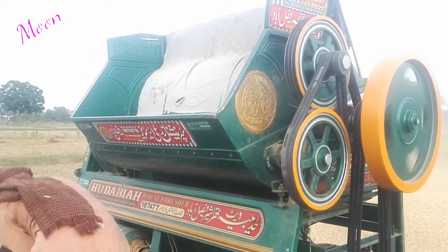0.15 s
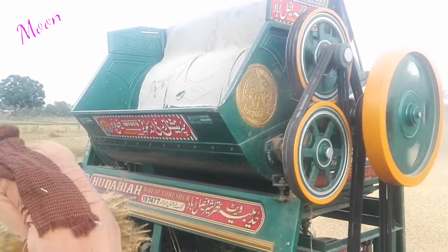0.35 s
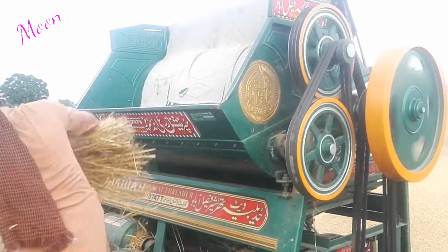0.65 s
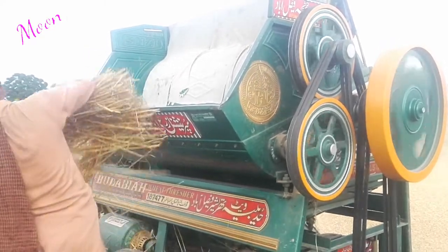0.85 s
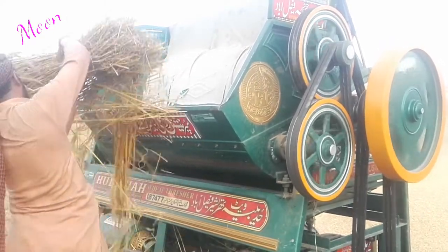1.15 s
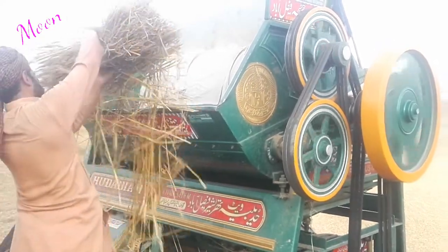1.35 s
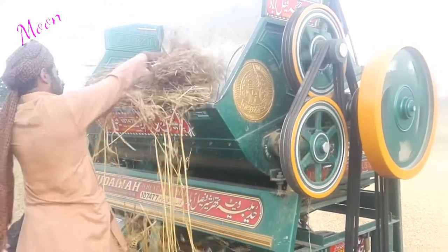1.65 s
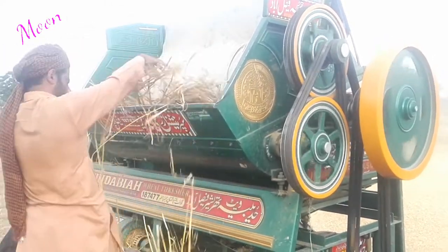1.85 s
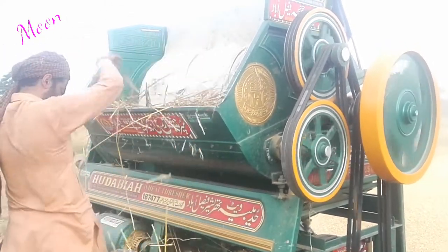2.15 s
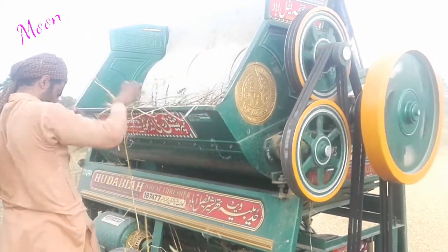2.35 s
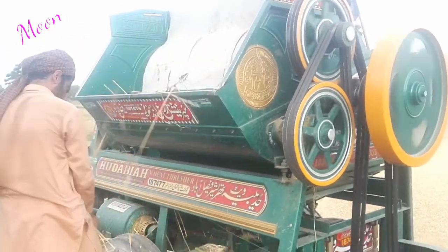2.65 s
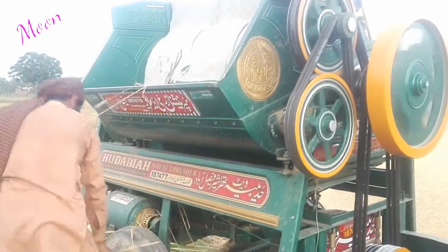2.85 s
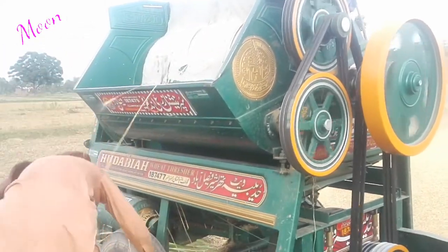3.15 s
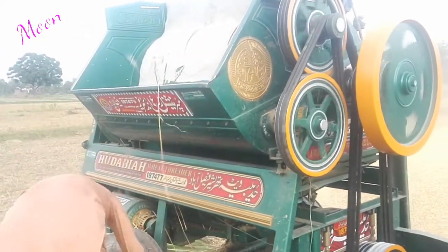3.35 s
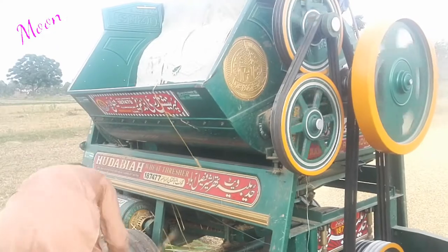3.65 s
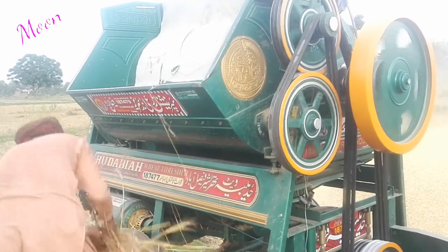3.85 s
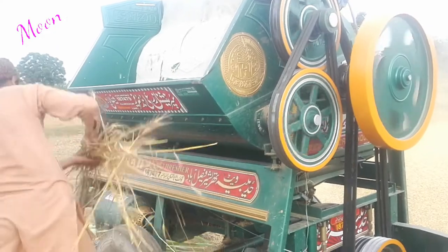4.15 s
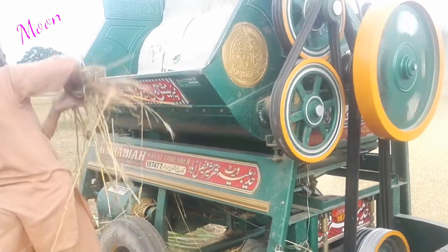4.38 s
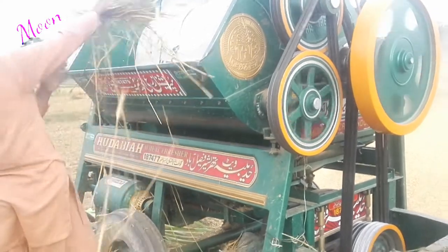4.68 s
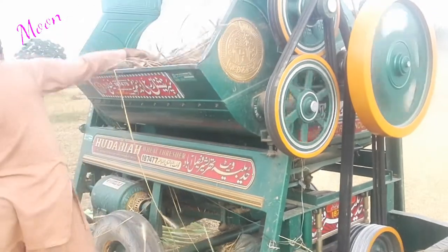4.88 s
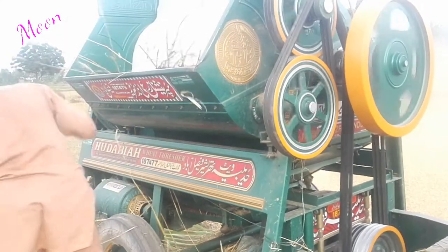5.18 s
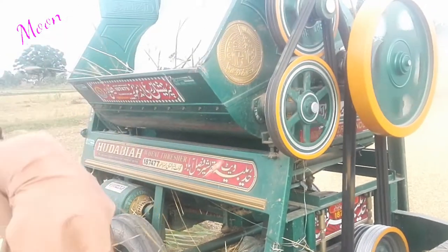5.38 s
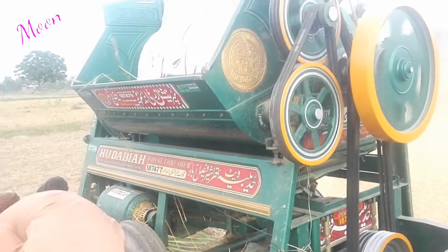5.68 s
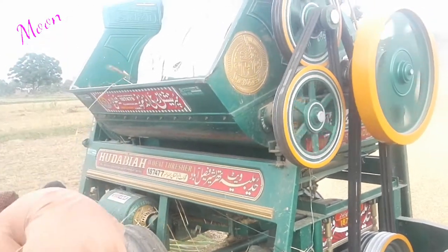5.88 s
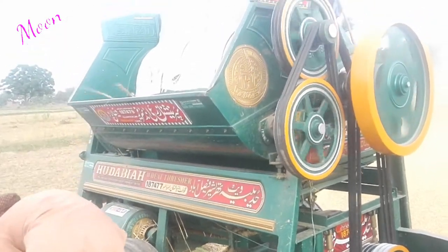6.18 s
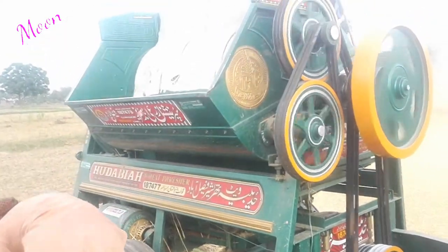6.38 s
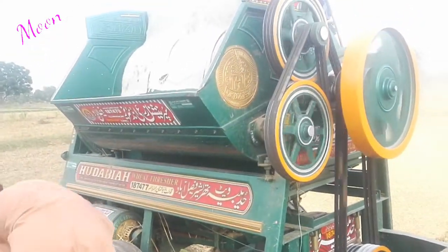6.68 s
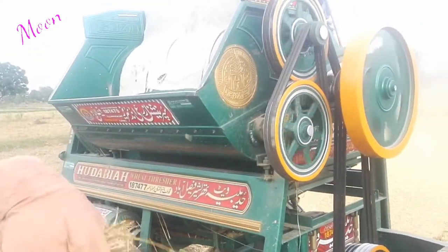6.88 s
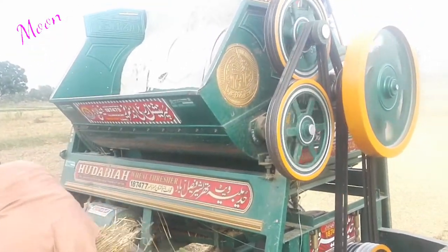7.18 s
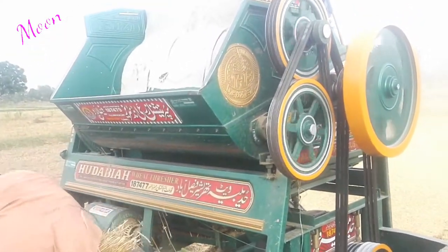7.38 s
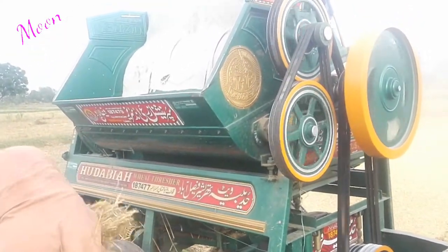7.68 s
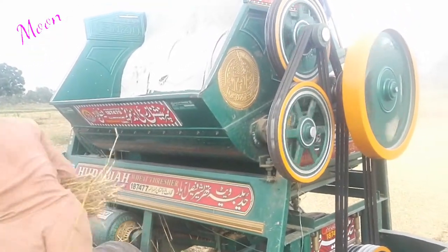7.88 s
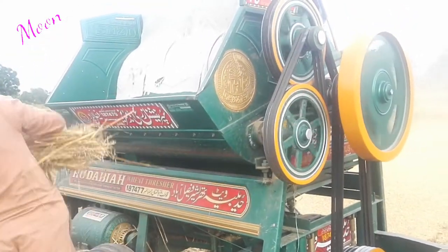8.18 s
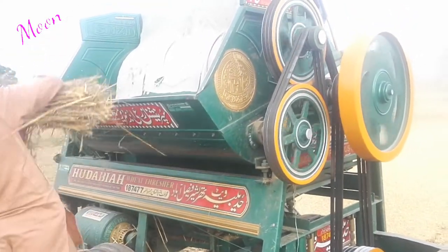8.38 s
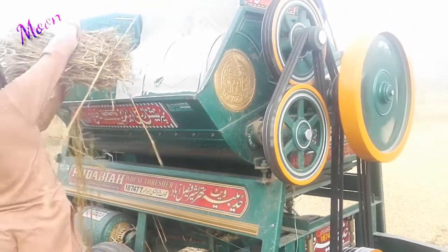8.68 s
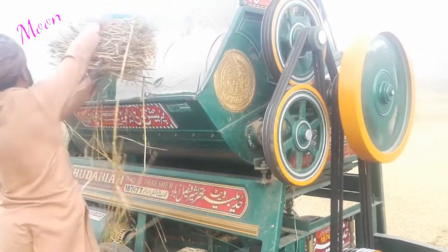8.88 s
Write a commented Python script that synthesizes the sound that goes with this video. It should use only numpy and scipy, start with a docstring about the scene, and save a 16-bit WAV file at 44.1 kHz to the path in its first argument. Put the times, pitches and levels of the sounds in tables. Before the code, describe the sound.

A wheat thresher is already at full run and never stops, recorded close in an open field with a stereo microphone. A deep fan hum around 60 Hz, wavering beater drones and a three-cylinder diesel's fast clatter merge with rattling, faintly ringing steel panels. Chopped straw hisses densely over it, brightest on the right. From 0 to 2.7 s the pitch creeps up, with the straw thinning near 2 s and thickening again after. From 2.8 to 4.5 s the whole machine sags slightly in pitch, the low hum swells, and the hiss grows rougher, surging in short gusts strongest around 4 to 5.9 s. Speed then recovers gradually, rising until 9 s as the straw eases, still gusting. Tiny dry snaps tick on the right near 0.6, 4.5, 5, 5.2 and 8.2 to 8.4 s; faint hard knocks fall around 0.5, 1.3, 2.7, 3.1, 3.7 and 4.8 s.

```python
"""Chopped straw hisses out to the right, hardest under load, over the rumble and rattle of a steel housing.
It comes from a belt-driven wheat thresher, fed by hand in an open field: filtered clicks, surging in level.
A three-cylinder tractor diesel turns the beater drum and chaff fan; all slow together when a sheaf goes in.
Their drones are harmonics of one shared speed, swelling at resonances; stalks snap and hard bits knock."""
import sys
import numpy as np
from scipy import signal
from scipy.fft import rfft, irfft, next_fast_len
from scipy.io import wavfile
from scipy.ndimage import uniform_filter1d

SR = 44100
rng = np.random.default_rng(int(sys.argv[2]) if len(sys.argv) > 2 else 0)


def store_wav(level_fs):
    """Save 16-bit WAV to argv[1]."""
    pcm = np.round(np.clip(np.atleast_2d(level_fs), -1, 1) * 32767)
    wavfile.write(sys.argv[1], SR, pcm.T.astype(np.int16))


N = 398218
TIME = np.arange(N) / SR  # s

# spectrum of diesel knock and of hard bits on the housing: (frequency [Hz], relative level [dB])
CLATTER_SPECTRUM = [(500, -13), (1100, 0.5), (1500, 4), (1750, 2.5), (2100, 3.5), (2600, 2.8), (3200, -0.5),
                    (4000, -3), (6000, -6.5), (14000, -10.5)]
# spectrum of straw at the right ear: (frequency [Hz], relative level [dB])
STRAW_RIGHT_SPECTRUM = [(1000, -24), (2400, -15), (3500, -11.4), (4300, -9), (5400, -6.1), (6200, -1.7),
                        (7400, .3), (8600, -1.2), (10400, 0), (11300, -1.9), (13100, -9.5), (14200, -11.8)]


def undb(db):
    """Logarithmic level: 20 dB is a tenfold amplitude."""
    return 10 ** (np.asarray(db) / 20)


def unit(x):
    """Root-mean-square normalisation: scale to rms 1."""
    return x / np.sqrt(np.mean(x ** 2))


def curves(table):
    """Linear interpolation: each column after the time, at every sample."""
    seconds, *columns = np.transpose(table)
    return [np.interp(TIME, seconds, column) for column in columns]


def walk(rate):
    """Band-limited random modulation: held values, smoothed, changing about rate times a second, rms 1."""
    hold = max(int(SR / rate), 2)
    values = rng.standard_normal(N // hold + 2)
    held = np.repeat(values, hold)[rng.integers(hold):][:N]
    return unit(uniform_filter1d(held, hold))


def colour(x, points):
    """Linear filtering: multiply the spectrum by a (Hz, dB) curve, then scale to rms 1."""
    size = next_fast_len(N)
    hz, db = np.transpose(points)
    bins_hz = np.maximum(np.arange(size // 2 + 1) * SR / size, 1)
    gain = undb(np.interp(np.log(bins_hz), np.log(hz), db))
    gain = gain * np.minimum(bins_hz / hz[0], 1) ** 2  # 12 dB per octave down below the first point
    return unit(irfft(rfft(x, size) * gain, size)[..., :N])


def from_right(x, lag_ms):
    """Interaural delay: a wavefront from the right reaches the left microphone later."""
    left = np.interp(TIME - lag_ms / 1000, TIME, x)
    return np.array([left, x])


def tones(turns, speed, steady, drones, flutter, wobble_ms):
    """Harmonics of rotation, some swelling at resonance; churning air wavers them, the high ones most."""
    flutter_rate, full_flutter_hz = 13, 480  # changes per second; pitch from which flutter is full
    mean_rate = turns[-1] / TIME[-1]
    shaken = turns + wobble_ms / 1000 * walk(8.3) * mean_rate
    gains = [(multiple, undb(db)) for multiple, db in steady]
    for multiple, db, best_speed, width in drones:
        resonance = 1 / (1 + ((speed - best_speed) / width) ** 2)
        gains.append((multiple, undb(db) * resonance))
    total = 0
    for multiple, gain in gains:
        depth = flutter * min(multiple * mean_rate / full_flutter_hz, 1)
        phase = 2 * np.pi * (round(multiple) * shaken + rng.random()) + depth * walk(flutter_rate)
        level = np.sqrt(2) * gain * (1 + depth * walk(flutter_rate))
        total = total + level * np.sin(phase)
    return total


def strokes(turns, decay, scatter_db):
    """Exponential decay from each turn's start, time constant a share of the turn; strengths vary by chance."""
    size = undb(scatter_db * rng.standard_normal(int(turns[-1]) + 2))
    return unit(size[turns.astype(int)] * np.exp(-(turns % 1) / decay))


def impacts(rate, spread_db):
    """Shot noise: a dense random rain of clicks, rate per second, most weak and a few strong."""
    size = undb(spread_db * np.minimum(rng.exponential(size=N), 4.5))
    struck = rng.random(N) < rate / SR
    return unit(struck * size * rng.standard_normal(N))


def straw(beats, fan_turns, flow_db):
    """Impact noise: chaff sprays sheet metal in gusts, loudest on the right; more straw makes it brighter."""
    # spectrum of straw at the left ear: (frequency [Hz], relative level [dB])
    straw_left = [(1000, -10), (2400, -3), (3500, 0), (4300, -1), (5600, -3.4), (7200, -1.5), (9000, -1.5),
                  (11000, 0), (14200, -2.2)]
    gust_db = flow_db + 0.4 * walk(45)
    throb = 1 + 0.035 * np.cos(2 * np.pi * fan_turns) + 0.049 * np.cos(2 * np.pi * beats)
    left_grains, right_grains = [impacts(34000, 1.5) for _ in range(2)]
    left = undb(-31.5) * colour(left_grains, straw_left)
    right = undb(-22.0) * colour(right_grains, STRAW_RIGHT_SPECTRUM)
    spray = np.array([left, right])
    lowpass = signal.butter(2, 6000, fs=SR, output="sos")
    coarse = signal.sosfiltfilt(lowpass, spray)
    fine = spray - coarse
    # the treble follows the flow about twice as strongly in dB
    coarse_gain = undb(0.52 * gust_db + 0.4 * walk(30) + 0.15)
    return throb * (coarse * coarse_gain + fine * undb(1.05 * gust_db))


def straw_flow():
    """Level modulation in dB: the slow load, a surge for each wad, and small gusts that grow with load."""
    # straw passing through, rising after sheaves go in and then thinning: (time [s], flow [dB])
    load_points = [(0, -.1), (1.4, -.4), (1.95, -1.8), (2.45, -.1), (2.7, 1.4), (3.35, 1.2), (3.75, 2),
                   (4.0, 3), (4.3, 2.3), (4.65, 3.2), (5.1, 1.9), (5.6, .3), (5.9, 1.5), (7.05, 1),
                   (7.8, -.1), (9.0, -0.5)]
    # thick wads of straw thrown out: (time [s], surge [dB])
    wads = [(0.775, 1.6), (1.415, 1.6), (1.62, 2.2), (1.69, 2.2), (2.135, 1.8), (2.61, 2), (2.675, 2.1),
            (2.93, 1.8), (3.195, 2.2), (3.945, 2.5), (4.05, 3.8), (4.19, 3), (4.465, 3), (4.54, 3),
            (4.585, 1.4), (4.70, 2.2), (4.775, 1.9), (4.955, 3.5), (5.255, 3.8), (5.35, 3.8), (5.48, 3),
            (5.745, 4), (5.835, 3.2), (5.985, 2), (6.135, 1.7), (6.335, 2.3), (6.405, 2), (6.785, 1.9),
            (7.11, 2.6), (7.345, 2), (7.65, 2.8), (8.025, 3.5), (8.245, 2.6), (8.355, 2.6), (8.65, 2),
            (8.85, 2)]
    attack_s, release_s = 0.022, 0.03
    gust_rate, gust_spread_db, gust_growth = 34, 0.48, 0.06  # changes per second; dB; growth per dB of load
    load_db = curves(load_points)[0]
    wads_db = 0
    for second, surge_db in wads:
        shape = np.interp(TIME - second, [-attack_s, 0, release_s], [0, 1, 0])
        wads_db = wads_db + surge_db * np.sqrt(shape)
    gusts_db = gust_spread_db * (1 + gust_growth * load_db) * walk(gust_rate)
    return load_db + wads_db + gusts_db


def drum(beats, fan_turns, speed, flow_db, rattle_db):
    """Forced vibration: beaters drone and pelt the housing with stalks; the fan's turn makes it throb."""
    # steady tones: (multiple of the beater rate, level [dB])
    steady = [(3, -60), (4, -50.5), (9, -55), (11, -49), (12, -55), (21, -56), (39, -50.5)]
    # tones swelling at a housing resonance: (multiple of the beater rate, top level [dB],
    # fan blade rate there [Hz], half-width in blade rate to 6 dB down [Hz])
    drones = [(6, -43, 61.2, .55), (6, -40, 64.5, .7), (13, -41.5, 61.9, 1.4), (14, -41.8, 62, 1.1),
              (15, -46, 61.4, .8), (18, -44, 62.1, 1.4), (20, -42.5, 61.95, .55), (20, -47.5, 63.5, .45),
              (23, -45.8, 64.3, .8), (24, -44.8, 61.7, .8), (27, -46.8, 62.5, 1.1)]
    # spectrum of the pelted housing: (frequency [Hz], relative level [dB])
    housing_spectrum = [(20, -22), (50, -13), (110, -11.5), (200, -2), (290, -1.5), (370, -5), (480, -3),
                        (740, -1.5), (830, -5), (980, -4), (1130, -11.5), (1500, -10.5), (3000, -24.5),
                        (8000, -18)]
    drone = tones(beats, speed, steady, drones, flutter=0.3, wobble_ms=0.02)
    beating = 1.0 + 0.15 * strokes(2 * beats, decay=0.61, scatter_db=5.5)
    pelting = beating * (1 + 0.084 * np.cos(2 * np.pi * fan_turns))
    stalks = [impacts(12000, 1.0) * pelting for _ in range(3)]
    body = undb(-31.0) * colour(stalks[0], housing_spectrum) + panels(stalks[1])
    # shorter waves leave the panels in many directions and differ between the microphones
    short_waves = [(hz, db + 20 * np.log10(min(hz / 1100, 1))) for hz, db in housing_spectrum]
    scattered = colour(stalks[2], short_waves) * np.array([[1], [-1]])
    housing = from_right(body, lag_ms=0.1) + undb(-34.5) * scattered
    housing_gain = undb(rattle_db + 0.21 * flow_db + 0.5 * walk(20))
    lean_db = 0.55 * np.array([[1], [-1]])  # slightly louder on the left
    return (from_right(drone, lag_ms=0.11) + housing * housing_gain) * undb(lean_db)


def panels(x):
    """Modal resonance: each steel panel rings at its own pitch when pelted."""
    # ringing panels: (frequency [Hz], bandwidth [Hz], relative level [dB])
    modes = [(245, 22, -55), (497, 10, -55), (690, 18, -53), (745, 10, -46.5), (767, 10, -50),
             (915, 8, -52), (1040, 20, -57), (1207, 12, -56), (1270, 90, -54), (1490, 90, -52.5),
             (2000, 70, -55)]
    total = 0
    for hz, width, db in modes:
        b, a = signal.iirpeak(hz, hz / width, fs=SR)
        total = total + undb(db) * unit(signal.lfilter(b, a, x))
    return total


def diesel(cycles, speed, rattle_db):
    """Periodic combustion: exhaust harmonics and drones, with a burst of knock at each of three firings."""
    # steady tones: (multiple of the four-stroke cycle rate, level [dB])
    steady = [(3, -52.5), (6, -47.5), (8, -55), (9, -47), (11, -59), (12, -46), (13, -52.5), (19, -44),
              (21, -61), (24, -52), (30, -54.5)]
    # tones swelling at a housing resonance: (multiple of the cycle rate, top level [dB],
    # fan blade rate there [Hz], half-width in blade rate to 6 dB down [Hz])
    drones = [(15, -42.5, 63.4, 1.4), (18, -44.5, 64.5, .8), (32, -38.3, 63.6, 1.75)]
    exhaust = tones(cycles, speed, steady, drones, flutter=0.22, wobble_ms=0.03)
    firings = strokes(3 * cycles, decay=0.44, scatter_db=1.8)
    knock = colour(impacts(14000, 0.92) * (1.36 + 0.93 * firings), CLATTER_SPECTRUM)
    direct = from_right(undb(-35.5) * knock, lag_ms=0.445)
    # steady noise stands for knock scattered by the machine and the ground
    scattered = undb(-56) * colour(rng.standard_normal((2, N)), CLATTER_SPECTRUM)
    return from_right(exhaust, lag_ms=0.2) + undb(rattle_db) * (direct + scattered)


def fan(turns, speed):
    """Blade-passing tones: five blades hum deeply, the hum swelling most when the machine labours."""
    # steady tones: (multiple of the fan's turning rate, level [dB])
    steady = [(4, -59), (8, -62), (10, -43), (20, -43)]
    # tones swelling at a housing resonance: (multiple of the turning rate, top level [dB],
    # fan blade rate there [Hz], half-width in blade rate to 6 dB down [Hz])
    drones = [(5, -34.7, 61.2, 2.8), (15, -41.3, 62.6, 1.7), (16, -44, 61.8, .9), (34, -48.5, 64.2, 1.1),
              (58, -40.3, 64.1, .95), (59, -47.5, 63.2, .8), (60, -44, 62.1, .7), (60, -43.5, 64.05, .4),
              (78, -47, 61.4, .9)]
    hum = tones(turns, speed, steady, drones, flutter=0.22, wobble_ms=0.02)
    return from_right(hum, lag_ms=0.22)


def cracks(table, decay_ms):
    """Transient excitation: an exponentially dying burst of noise at each (s, dB) row."""
    envelope = 0
    for second, db in table:
        age = TIME - second
        envelope = envelope + undb(db) * (age >= 0) * np.exp(-np.abs(age) * 1000 / decay_ms)
    return rng.standard_normal(N) * envelope


def stalk_hits():
    """Impulsive fracture and impact: stiff stalks snap on the right; harder bits knock on the housing."""
    # stiff stalks snapping: (time [s], level before filtering [dB])
    snap_rows = [(0.578, -17), (4.462, -13), (4.964, -15), (5.246, -15), (8.2285, -11), (8.2545, -14),
                 (8.3545, -13)]
    # hard bits knocking on the housing: (time [s], level before filtering [dB])
    knock_rows = [(0.501, -23), (1.285, -24), (2.659, -24), (3.127, -20), (3.725, -23), (4.78, -23)]
    snaps = cracks(snap_rows, decay_ms=1.2)
    knocks = cracks(knock_rows, decay_ms=2.5)
    # filtering keeps each rms; the snaps are 14 dB weaker on the left
    snaps = np.std(snaps) * colour(snaps, STRAW_RIGHT_SPECTRUM) * undb([[-14], [0]])
    knocks = np.std(knocks) * colour(knocks, CLATTER_SPECTRUM)
    return snaps + from_right(knocks, lag_ms=0.12)


def scene():
    """Kinematic coupling: belts tie every part to one speed, which sets how loud each part drones."""
    # shaft speed, sagging under load: (time [s], fan blade rate [Hz])
    speed_points = [(0.0, 62.5), (1.5, 63.68), (2.0, 64.08), (2.4, 64.57), (2.75, 64.78), (3.1, 63.83),
                    (3.5, 62.7), (4.0, 61.69), (4.5, 61.28), (5.0, 61.38), (6.0, 62.11), (7.0, 62.57),
                    (7.7, 63.37), (9.0, 64.8)]
    # gain of the housing rattle and diesel knock: (time [s], level [dB])
    rattle_points = [(0, 0), (1.2, -0.4), (2.2, 0.6), (4.5, 0.5), (6, .5), (9, .5)]
    # turns per passing fan blade; the engine's counts its four-stroke cycle, the drum's its beats
    engine_ratio, drum_ratio, fan_ratio = 0.2084, 0.61744, 0.20016
    speed, rattle_db = curves(speed_points)[0], curves(rattle_points)[0]
    blades = np.cumsum(speed) / SR  # blades passed so far
    beats, fan_turns = drum_ratio * blades, fan_ratio * blades
    flow_db = straw_flow()
    machine = straw(beats, fan_turns, flow_db) + drum(beats, fan_turns, speed, flow_db, rattle_db)
    machine = machine + diesel(engine_ratio * blades, speed, rattle_db) + fan(fan_turns, speed)
    return machine + stalk_hits()


def record(dry):
    """Elliptic low-pass filtering: the microphones' channel cuts the top steeply."""
    top_hz = 14230
    lowpass = signal.ellip(12, 0.1, 85, top_hz, fs=SR, output="sos")
    return signal.sosfilt(lowpass, dry)


dry = scene()
out = record(dry)
store_wav(out)
```